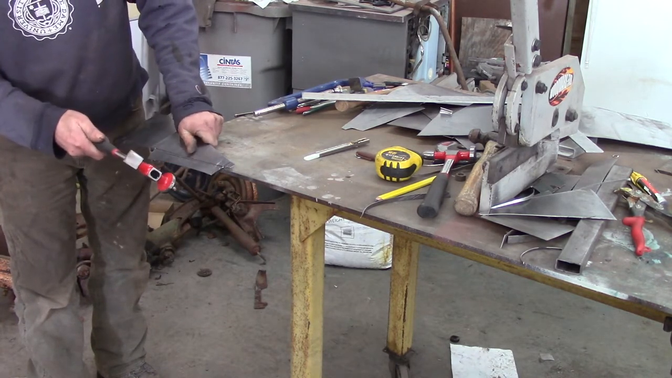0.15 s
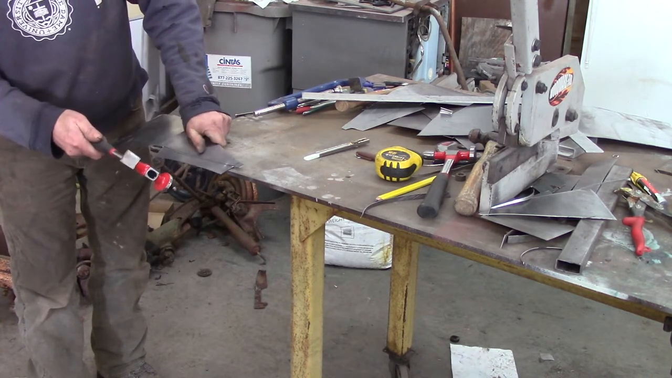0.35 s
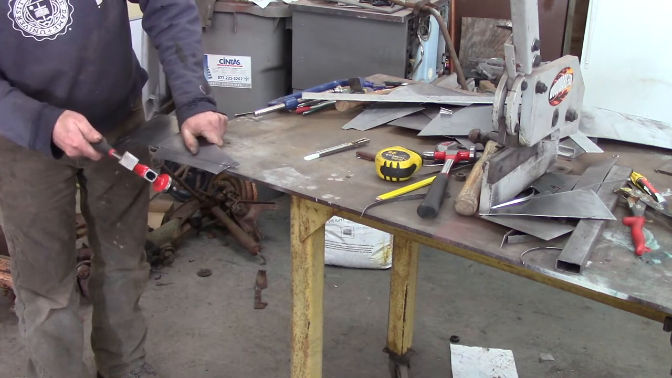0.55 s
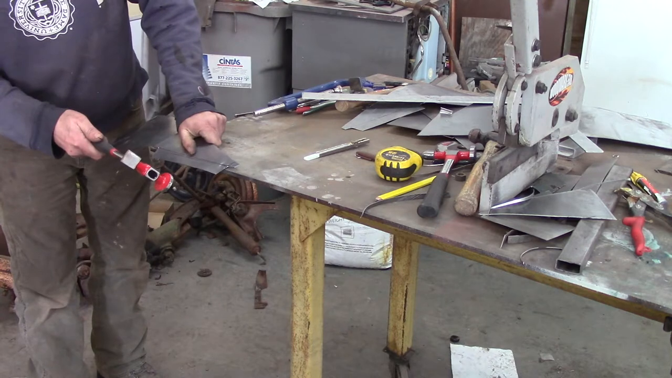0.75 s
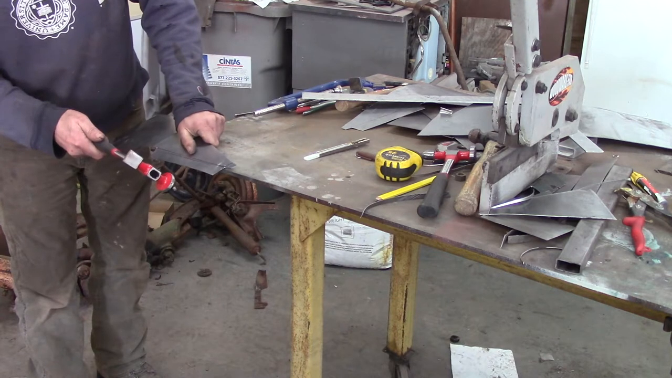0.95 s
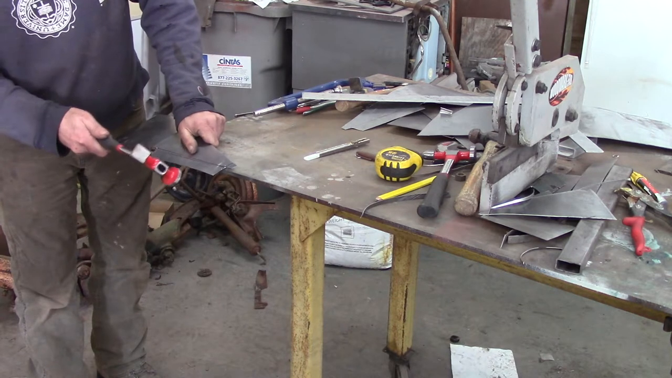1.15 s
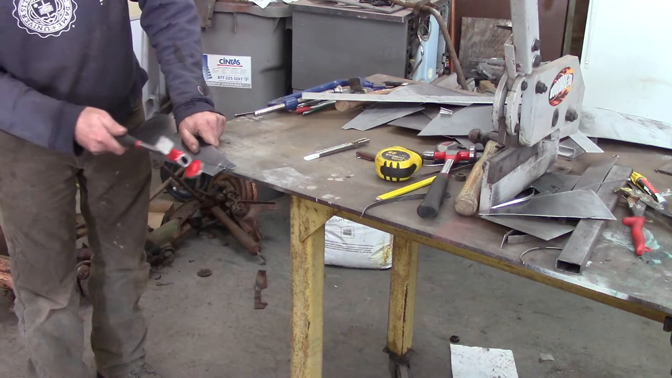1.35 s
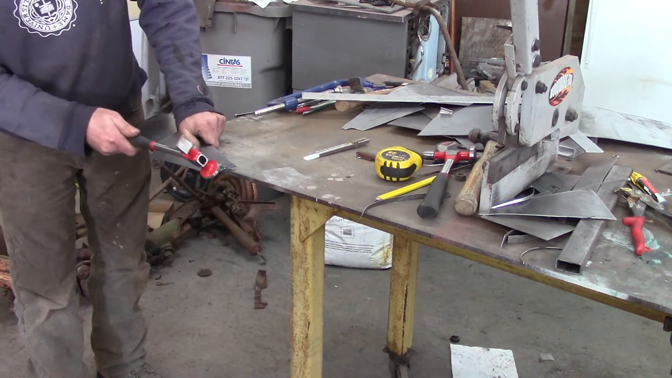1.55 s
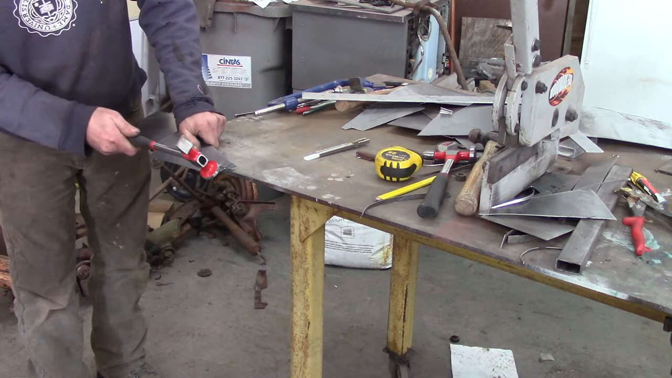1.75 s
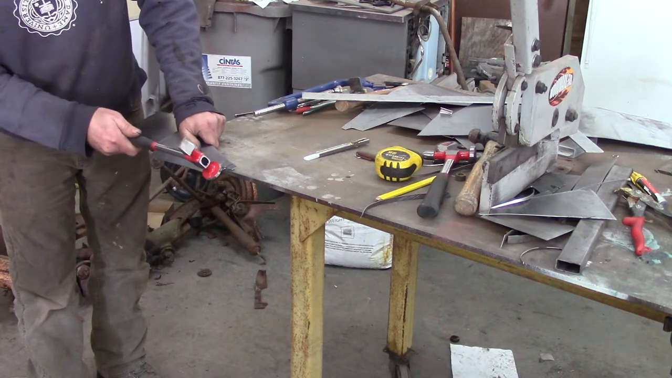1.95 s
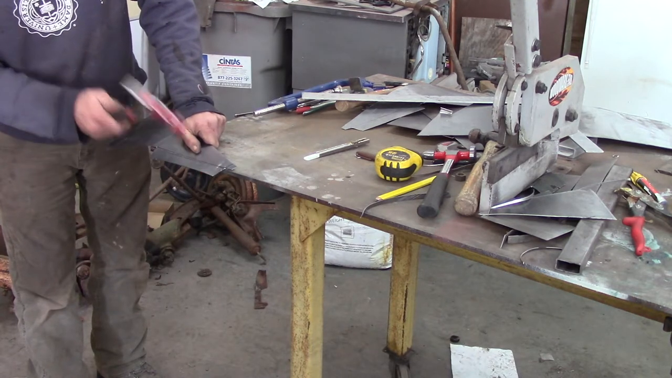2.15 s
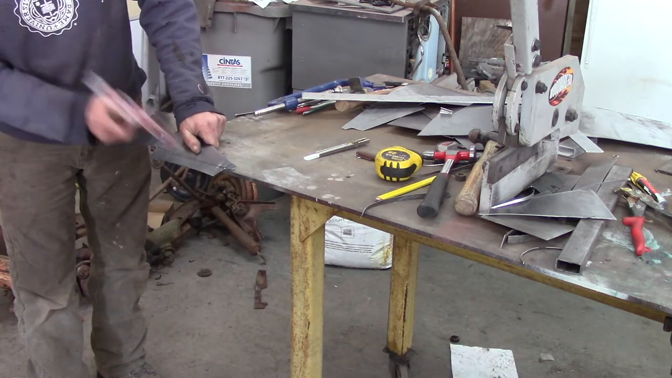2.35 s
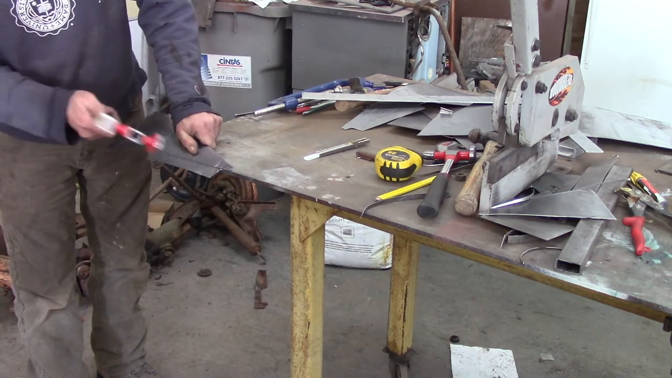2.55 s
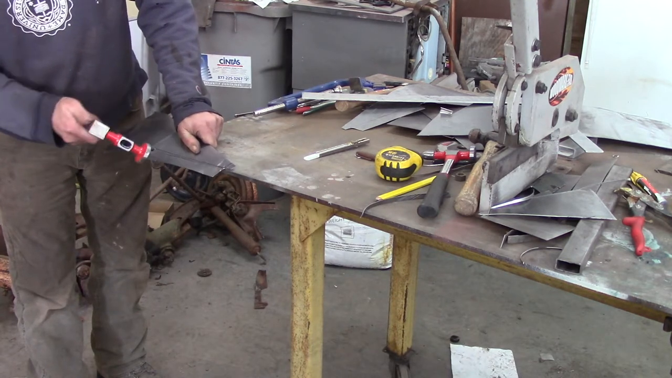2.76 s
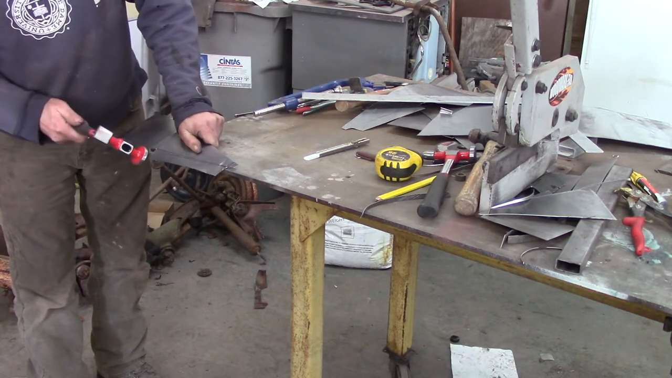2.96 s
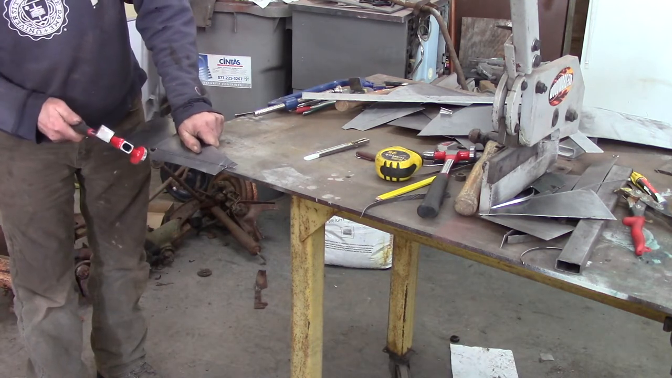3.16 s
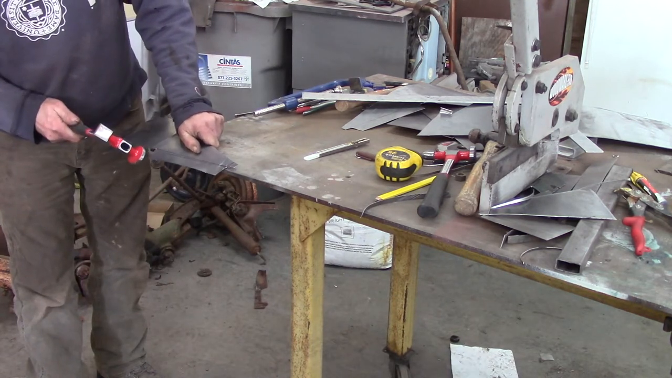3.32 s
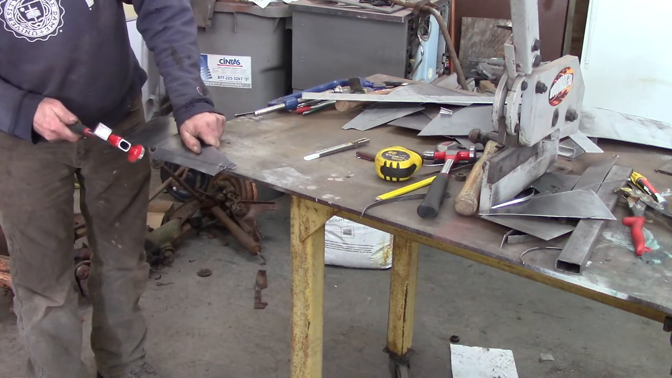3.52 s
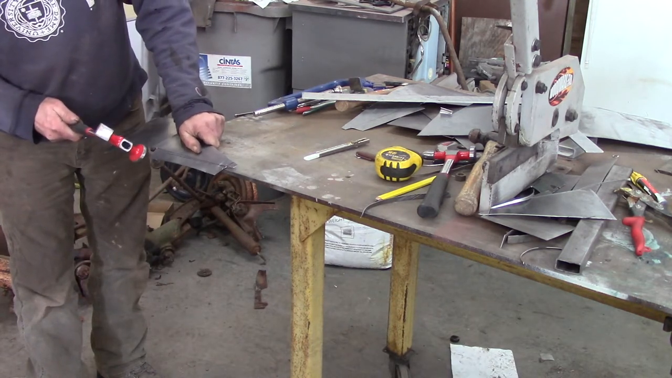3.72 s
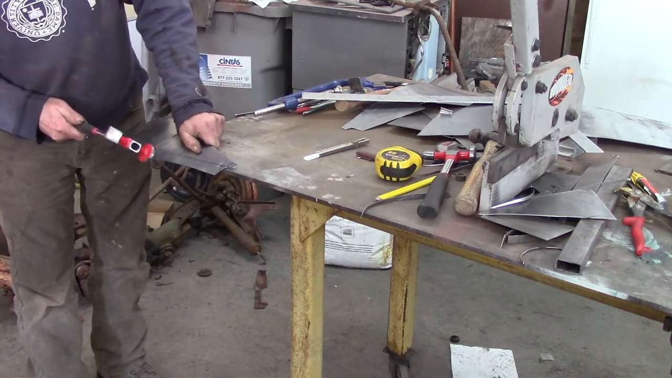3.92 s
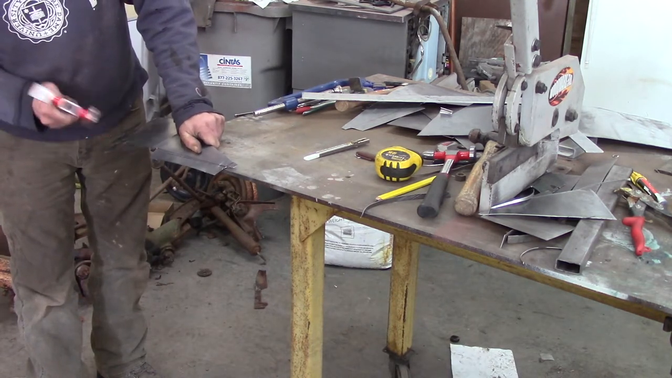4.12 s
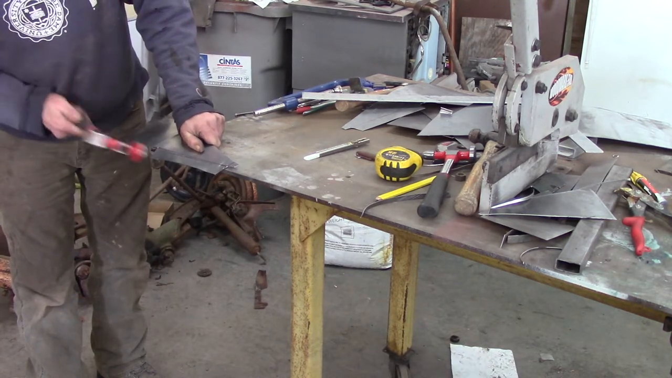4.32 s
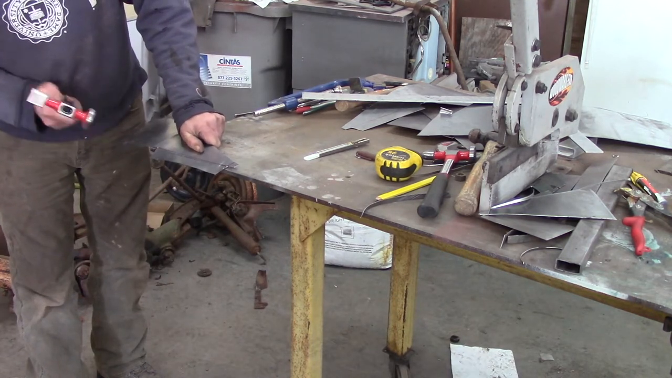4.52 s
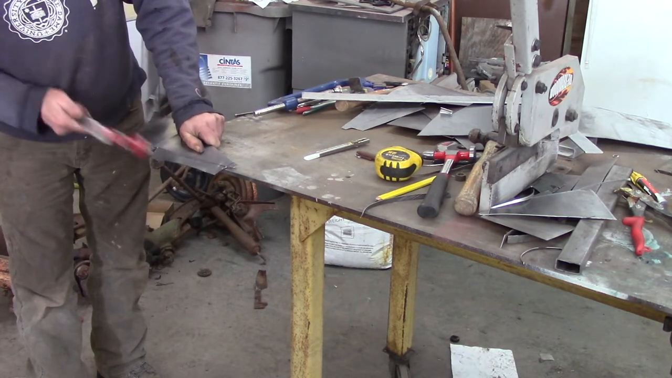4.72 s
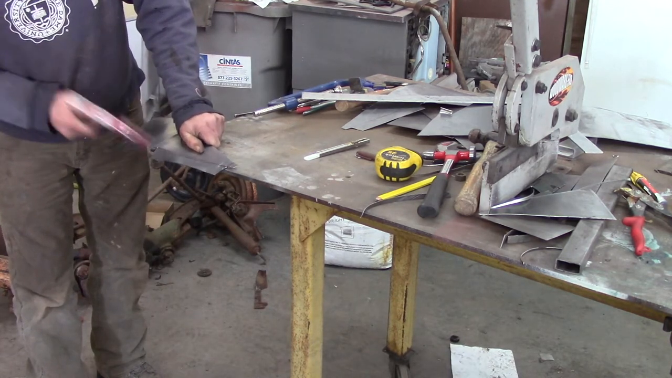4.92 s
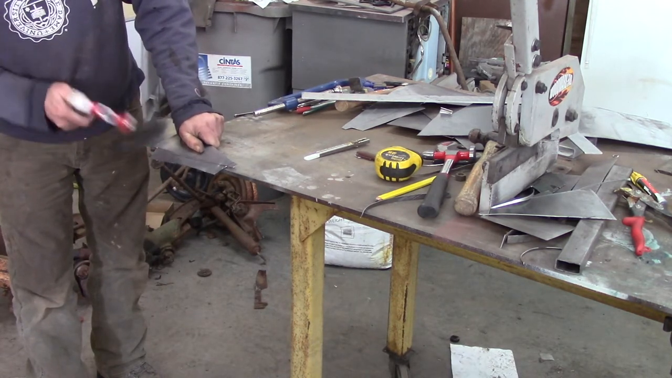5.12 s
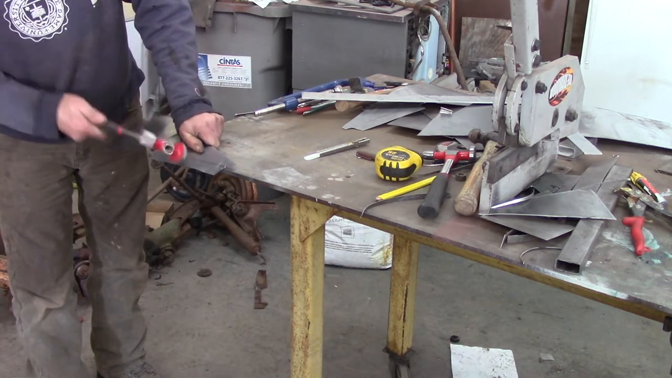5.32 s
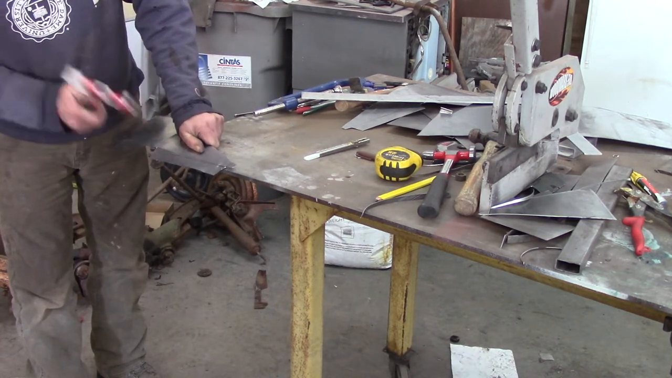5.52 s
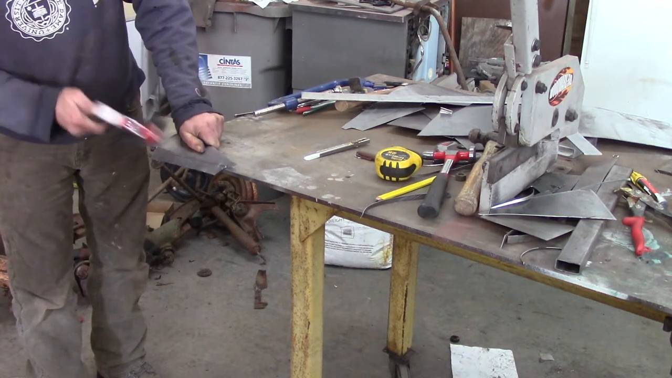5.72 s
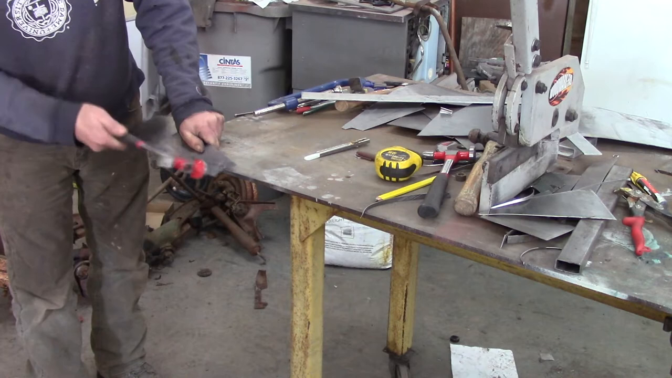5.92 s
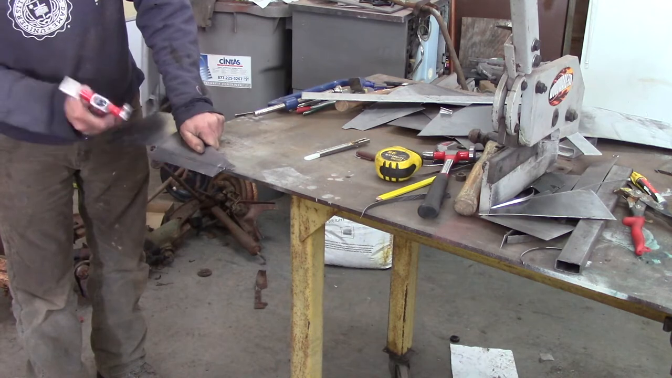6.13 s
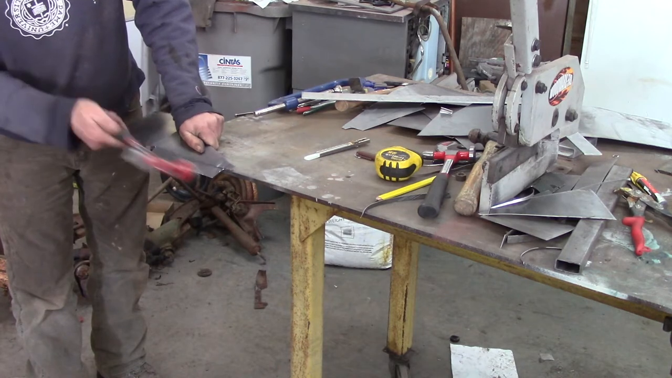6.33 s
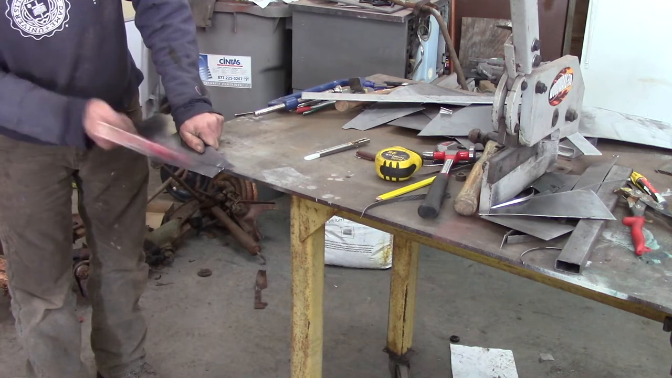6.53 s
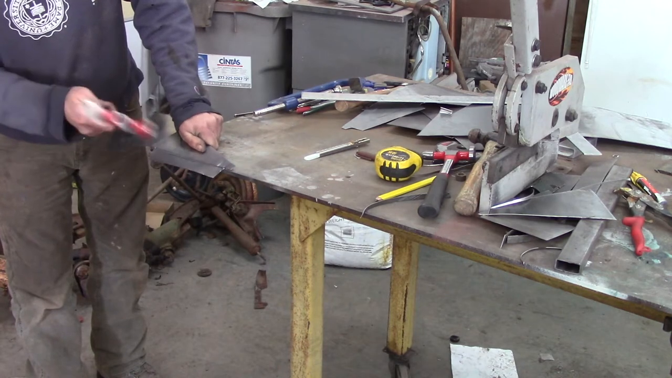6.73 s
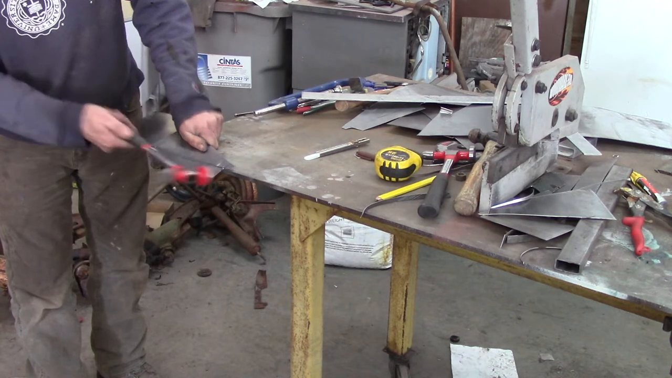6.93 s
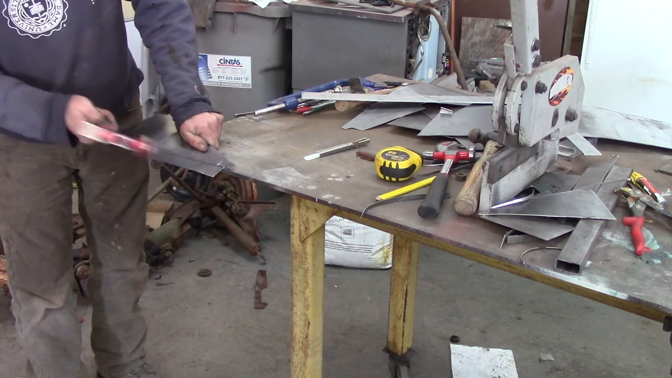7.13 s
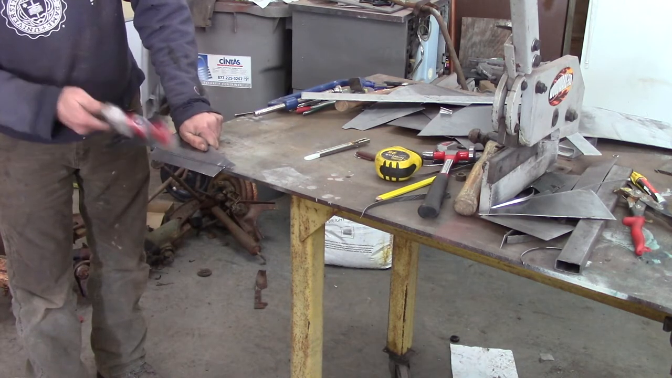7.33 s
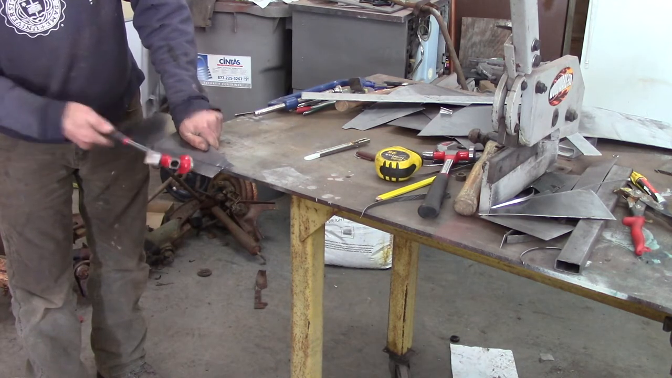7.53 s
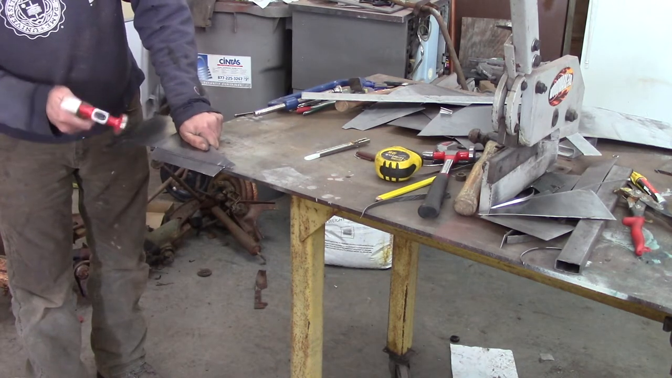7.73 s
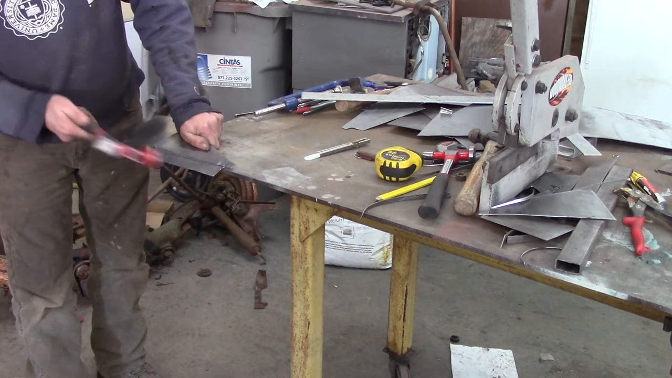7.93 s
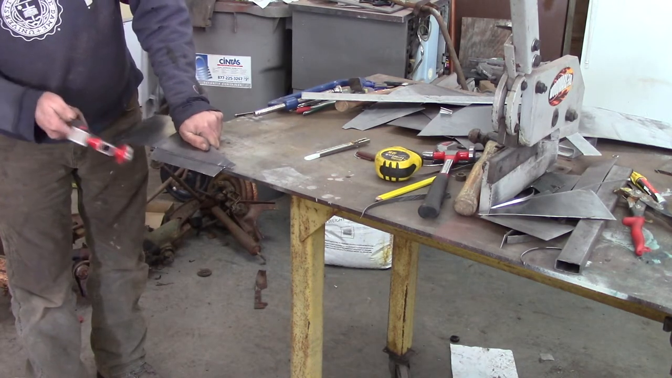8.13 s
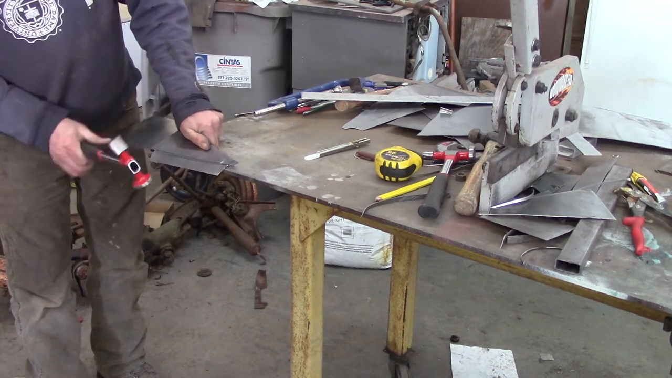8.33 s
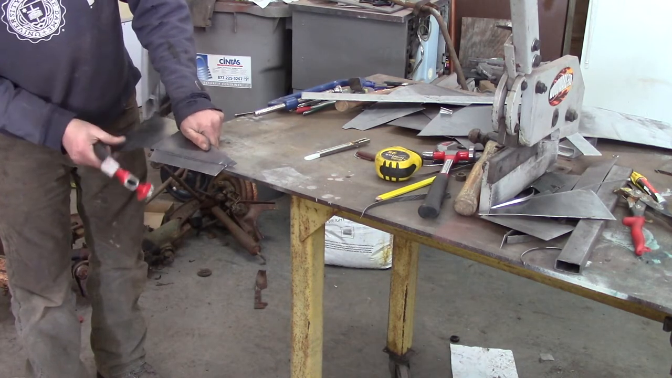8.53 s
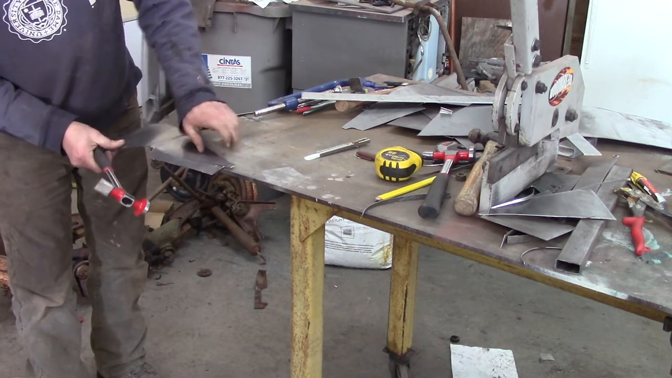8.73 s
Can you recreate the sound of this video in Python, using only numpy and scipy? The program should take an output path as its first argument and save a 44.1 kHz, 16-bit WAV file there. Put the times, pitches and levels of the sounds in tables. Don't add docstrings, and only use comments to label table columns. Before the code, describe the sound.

Faint low room drone and a barely audible rapid ticking from a distant machine. Sheet steel scuffs and clicks, is tapped lightly, then hit hard once. After more quiet handling, a regular run of a dozen full hammer blows rings harshly over the bench edge, overlapping with reverberant tails. It ends in hollow knocks and scrapes. Narrow stereo, close, heavily limited blows.

```python
import sys
import numpy as np
from scipy import signal
from scipy.fft import rfft, irfft
from scipy.io import wavfile
from scipy.ndimage import uniform_filter1d

SR = 44100
rng = np.random.default_rng(int(sys.argv[2]) if len(sys.argv) > 2 else 0)


def pcm_store(signal):
    levels = np.round(np.clip(np.atleast_2d(signal), -1, 1) * 32767)
    wavfile.write(sys.argv[1], SR, levels.astype(np.int16).T)


def magnitude_from_level(level_db):
    exponent = np.asarray(level_db, float) / 20
    return 10 ** exponent


N = 386757

# [f/Hz, level/dB per Hz]
AIR_COLOUR = [(15, -41), (25, -36), (43, -40.5), (134, -15), (301, -5.5), (354, -12), (463, -10),
              (641, -14), (695, -15.5), (1020, -20), (1230, -26), (4370, -38), (16000, -49.5)]
# [f/Hz, side minus mid level/dB]
AIR_SIDE = [(60, 6), (110, -12.5), (200, -20), (380, -18.5), (700, -16.5), (1290, -17.5), (2380, -9.5),
            (4400, -16), (8120, -26.5), (15000, -26.5)]
# [start t/s, length t/s, hiss level/dB, rasp level/dB]
SCRAPES = [(0.0, 0.0079, -49, -20.5), (0.144, 0.045, -43.5, -29), (0.187, 0.037, -42.5, -24),
           (0.478, 0.061, -60, -35.5), (0.734, 0.043, -61, -34.5), (0.906, .02, -66, -50),
           (3.432, 0.17, -79, -59), (8.308, 0.081, -68, -41), (8.597, 0.17, -75, -51),
           (8.511, 0.034, -58, -32.5), (8.537, 0.033, -50, -39), (8.645, .025, -54.5, -54),
           (8.737, .03, -51, -42)]
# [f/Hz, level/dB per Hz]
GRIT = [(880, -38), (1500, -21.5), (2300, -9), (2900, -2), (4330, -9.5), (9010, -10.5), (12900, -23.5),
        (16000, -38)]
# [f/Hz, width f/Hz, level/dB]
RASP_PEAKS = [(244, 62, 3.5), (734, 400, 11), (950, 510, 11), (1250, 760, 0.5)]
# [t/s, click level/dB, knock level/dB, low knock f/Hz, high knock f/Hz]
TICKS = [(0.164, -43, -23.5, 720, 1160), (0.207, -48, -28, 970, 1350), (0.5386, -43, -33, 600, 1370),
         (0.7565, -47, -35, 940, 1440), (0.9206, -55, -39, 730, 1460), (1.9165, -38.5, -29, 633, 1370),
         (2.9382, -42.5, -19.5, 735, 1250), (3.0294, -55, -35, 570, 990), (3.1192, -60, -37, 550, 1140),
         (3.4466, -51.5, -32, 950, 1450), (3.5124, -46, -31.5, 850, 1360), (3.6147, -57, -35, 730, 980),
         (8.1194, -34, -28, 646, 980), (8.1994, -43, -21.5, 626, 1270), (8.259, -46, -34, 580, 1286),
         (8.4208, -45.5, -30, 704, 1300), (8.4424, -47, -45, 630, 1240), (8.4856, -34.5, -22, 815, 1540),
         (8.514, -56, -21.5, 242, 350), (8.63, -64, -22, 235, 340), (8.745, -64, -26, 240, 332),
         (8.5494, -47, -30, 770, 1310), (8.6683, -55, -49, 590, 1320), (8.7305, -43, -35, 850, 1320)]
# [t/s, strength level/dB, crack level/dB, ring level/dB, brightness dB/octave]
TAPS = [
    (0.247, -17.5, 6.5, -6, 4),
    (1.458, -10, -1.5, -5, 0),
    (1.846, -16.5, -3, -5, -1),
]
# [f/Hz, level/dB, time to fall 60 dB t/s]
SHEET_MODES = [(610, -10, 0.68), (1170, -7.5, 0.23), (1300, -6, .25), (1386, -6, 0.22), (2200, -10.5, .4),
               (2385, -10, 0.14), (3600, -15, 0.19), (3790, -11, .4), (4700, -16, .3), (6115, -10.5, .27),
               (6520, -15, 0.18), (7220, -19, .2)]
# [f/Hz, level/dB per Hz]
TOUCH = [(240, -32.5), (520, -15), (1320, -3.5), (1780, -12), (3800, -14.5), (4300, -22.5), (6400, -18),
         (16000, -41.5)]
# [f/Hz, level/dB per Hz]
CRACK = [(880, -29), (1500, -11), (2740, -1), (5540, -6.5), (6240, -3), (7320, -6), (9950, -1.5),
         (13900, -16.5), (16000, -28)]
# [t/s, strength level/dB, brightness dB/octave, ring level/dB, bite near 3 kHz level/dB]
BLOWS = [(2.345, 5.5, 1.4, 2, 2.5), (4.201, 5.5, 0.86, 0.5, 0.1), (4.572, 7, 1.35, -1, 1.5),
         (4.905, 6, 1, 2.1, 0), (5.216, 6.5, 0.9, 4.8, 1), (5.538, 6.5, 1.24, 6.2, 1.7),
         (5.863, 5, 1.24, 3.5, 4), (6.19, 5.5, 2, 4, 1.5), (6.512, 4.5, 1.74, 5, 1.5),
         (6.831, 4.5, 2, 9, 2), (7.134, 7.5, 1.05, 5, 3), (7.443, 6, 1.2, 3.3, 2), (7.763, 6.5, 1, 4, 1.1)]
# [f/Hz, level/dB per Hz]
CLANG = [(35, -66), (60, -37), (133, -8.5), (363, -9.5), (607, -4), (862, -4.5), (968, -4), (1040, -10.5),
         (1310, -3), (2000, -10.5), (2710, -14.5), (7230, -18.5), (9790, -20), (16000, -41.5)]
# [f/Hz, level/dB, time to fall 60 dB t/s]
BENCH_MODES = [(88.2, -58, 0.56), (140, -19.5, 0.59), (190, -17, 0.37), (235.4, -11.5, 0.45),
               (340, -18.5, 0.54), (472, -27.5, 0.35), (604, -5, 0.3), (593, -20, 0.34), (785.4, -10, 0.5),
               (900, -34, 0.13), (978, -1.5, 0.39), (1101, -15, 0.57), (1237, -4, 0.36), (1325, -2.5, 0.21),
               (1289, -4.5, 0.12), (1653, -11, 0.1), (1755, -13, 0.45), (2210, -8, 0.17),
               (2420, -22.5, 0.16), (2666, -10, 0.28), (3540, -25, 0.2), (3420, -17.5, 0.08)]
# [f/Hz, time to fall 60 dB t/s]
ROOM_T60 = [(100, 0.18), (400, 0.74), (1000, 0.75), (1900, 0.81), (2900, 0.79), (5000, 0.59), (9000, 0.38),
            (15000, 0.36)]

SLAP_S, SLAP_DB = 0.041, -12


def evened(x):
    return x / np.sqrt(np.mean(x ** 2) + 1e-20)


def read(points, hz):
    f, value = np.transpose(points)
    return np.interp(np.log(hz + 1), np.log(f + 1), value)


def add(mix, s, sound):
    part = mix[..., round(s * SR):][..., :sound.shape[-1]]
    part += sound[..., :part.shape[-1]]


def noise(count, colour, tilt_db=0):
    hz = np.fft.rfftfreq(count, 1 / SR)
    gain = magnitude_from_level(read(colour, hz) + tilt_db * np.log2(hz / 1000 + 0.045))
    return evened(irfft(rfft(rng.standard_normal(count)) * gain, count))


def air():
    frames, hz = N // 256 + 5, np.fft.rfftfreq(1024, 1 / SR)
    a, b, c, d, patches = rng.standard_normal((frames, 513, 5)).T
    patches = uniform_filter1d(patches, size=8, axis=0)
    patches = evened(uniform_filter1d(patches, size=10, axis=1))
    side = (c + 1j * d) * magnitude_from_level(read(AIR_SIDE, hz))[:, None]
    z = np.array([a + 1j * b, side])
    z *= magnitude_from_level(read(AIR_COLOUR, hz)[:, None] + 1.5 * patches)
    x = signal.istft(z, nperseg=1024, noverlap=768)[1][:, :N]
    return magnitude_from_level(-47.5) * x / np.std(x[0])


def sheet_rasp(x):
    out = 0
    for hz, width, db in RASP_PEAKS:
        peak = signal.iirpeak(hz, hz / width, SR)
        out = out + magnitude_from_level(db) * signal.lfilter(*peak, signal.lfilter(*peak, x))
    return out


def scrapes():
    out, t = np.zeros(N), np.arange(SR // 4) / SR
    for s, length, hiss_db, rasp_db in SCRAPES:
        lean_db = 2 * np.maximum(1 - t / length, 0)
        release_db = 60 * np.maximum(t - length, 0) / 0.086
        press = magnitude_from_level(lean_db - release_db) * np.minimum(t / 0.02, 1) ** 2
        grain = magnitude_from_level(1.8 * evened(uniform_filter1d(rng.standard_normal(len(t)), size=150)))
        hiss = magnitude_from_level(hiss_db) * noise(len(t), GRIT)
        rasp = magnitude_from_level(rasp_db - 10.0) * evened(sheet_rasp(rng.standard_normal(len(t))))
        add(out, s, (hiss + rasp) * evened(grain) * press)
    return out


def machine():
    out, t = np.zeros(N), np.arange(1500) / SR
    tones = np.sin(2 * np.pi * 1760 * t) + magnitude_from_level(-9.5) * np.sin(2 * np.pi * 2150 * t)
    pip = magnitude_from_level(-60 * t / 0.045) * tones * np.minimum(t / 0.0022, 1)
    times = np.arange(0.0243, N / SR, 0.06672)
    for k, (s, luck) in enumerate(zip(times, rng.standard_normal(len(times)))):
        add(out, s, magnitude_from_level(-49.0 - 9.5 * (k % 2) + 2.5 * luck) * pip)
    return out


def ticks():
    out, t = np.zeros((2, N)), np.arange(6000) / SR
    dull = signal.butter(2, 2200., fs=SR)
    for s, click_db, knock_db, low_hz, high_hz in TICKS:
        click = magnitude_from_level(click_db - 60 * t / 0.046) * noise(len(t), GRIT, tilt_db=0.5)
        click *= np.minimum(t / 0.0021, 1)
        shake = magnitude_from_level(-60 * t / 0.052) * rng.standard_normal(len(t))
        low = signal.lfilter(*signal.iirpeak(low_hz, 8, SR), shake)
        high = signal.lfilter(*signal.iirpeak(high_hz, 8, SR), shake)
        hollow = magnitude_from_level(knock_db + 12.0) * signal.lfilter(*dull, low + magnitude_from_level(-1.5) * high)
        add(out, s, np.array([click + hollow, magnitude_from_level(-3.0) * click + hollow]))
    return out


def impulse(colour, tilt_db, count):
    hz = abs(np.fft.fftfreq(4096, 1 / SR))
    log_gain = np.log(magnitude_from_level(read(colour, hz) + tilt_db * np.log2(hz / 1000 + .05)))
    click = np.fft.ifft(np.exp(np.conj(signal.hilbert(log_gain)))).real
    return np.pad(click / np.linalg.norm(click), (0, count - 4096))


def ring(modes, t, spread_db, split, chatter_db):
    out, slow = np.zeros(len(t)), t[::64]
    for (hz, db, t60), luck in zip(modes, rng.standard_normal((len(modes), 3, 3))):
        detune_hz = hz * split * luck[1][:, None] * [[0], [1], [1]]
        phases = 2 * np.pi * detune_hz * slow + 10 * luck[2][:, None]
        beats = magnitude_from_level(spread_db * luck[0]) @ np.exp(1j * phases)
        flicker = rng.standard_normal((2, len(slow)))
        flicker = evened(uniform_filter1d(flicker, size=14, axis=1))
        swell = 1 - np.exp(-slow * hz / 2.6)
        fade = magnitude_from_level(db - 60 * slow / t60 + chatter_db * flicker[0])
        motion = beats * swell * fade * np.exp(.9j * flicker[1])
        wander = np.interp(t, slow, np.unwrap(np.angle(motion + 1e-30)))
        out += np.interp(t, slow, abs(motion)) * np.cos(2 * np.pi * hz * t + wander)
    return out


def strike(modes, colour, tilt_db, ring_db, crack_db, crack_s, rattle_db, rattle_s,
           spread_db, split, slap_db, jolt_db):
    t = np.arange(SR * 3 // 4) / SR
    crack = magnitude_from_level(crack_db - 60 * t / crack_s) * noise(len(t), CRACK) * np.minimum(t / 0.0013, 1) ** 2
    slap = magnitude_from_level(slap_db + 3.8 * rng.standard_normal())
    crack = crack + slap * np.roll(crack, round(SLAP_S * SR))
    jolts = magnitude_from_level(jolt_db * evened(uniform_filter1d(rng.standard_normal(len(t)), size=400)))
    rattle = magnitude_from_level(rattle_db - 60 * t / rattle_s) * (1 - np.exp(-t / 0.0069)) ** 2
    rattle = rattle * noise(len(t), colour, tilt_db) * jolts
    rung = magnitude_from_level(ring_db) * ring(modes, t, spread_db, split, chatter_db=3.)
    feed = magnitude_from_level(28.5) * impulse(colour, tilt_db, len(t)) + magnitude_from_level(-6.5) * rung
    return np.array([crack + rattle + rung, feed])


def touch_colour(peak_db, width_oct):
    hz = np.geomspace(30, SR / 2, 400)
    lift = sum(np.exp(-(np.log2(hz / mode[0]) / width_oct) ** 2) for mode in SHEET_MODES)
    return np.transpose([hz, read(TOUCH, hz) + peak_db * np.minimum(lift, 1)])


def light_taps():
    out = np.zeros((2, N))
    for s, db, crack_db, ring_db, tilt_db in TAPS:
        colour = touch_colour(peak_db=ring_db + 12, width_oct=.04)
        tap = strike(SHEET_MODES, colour, tilt_db, ring_db - 2.5, crack_db + 9.0, crack_s=0.048,
                     rattle_db=9.5, rattle_s=0.16, spread_db=2.5, split=0.015,
                     slap_db=2 * SLAP_DB, jolt_db=.5)
        add(out, s, magnitude_from_level(db - 16.5) * tap)
    return out


def hammer_blows():
    out, hz = np.zeros((2, N)), np.geomspace(30, SR / 2, 60)
    bite = np.exp(-(np.log2(hz / 2950) / .24) ** 2)
    for s, db, tilt_db, ring_db, bite_db in BLOWS:
        colour = np.transpose([hz, read(CLANG, hz) + 2 * bite_db * bite])
        blow = strike(BENCH_MODES, colour, tilt_db, ring_db - 13.5, crack_db=6.5, crack_s=0.034,
                      rattle_db=-1.0, rattle_s=0.26, spread_db=3.0, split=.011,
                      slap_db=SLAP_DB, jolt_db=2.5)
        add(out, s, magnitude_from_level(db - 0.5) * blow)
    return out


def shop(x, count=3):
    taps = np.zeros((2 * count, SR))
    at = np.arange(300, SR - 20, 20) + rng.integers(0, 20, (2 * count, (SR - 301) // 20))
    np.put_along_axis(taps, at, rng.choice([-1., 1.], at.shape), 1)
    hz, t, z = signal.stft(taps, SR, nperseg=256)
    build = 1 - np.exp(-t / (0.001 + 3.5 / (hz[:, None] + 100)))
    lumps = uniform_filter1d(rng.standard_normal(z.shape), size=5, axis=2)
    lumps = evened(uniform_filter1d(lumps, size=30, axis=1))
    fade = magnitude_from_level(-60 * t / read(ROOM_T60, hz)[:, None])
    tails = signal.istft(z * magnitude_from_level(1.87 * lumps) * build * fade, SR, nperseg=256)[1][:, :SR]
    tails /= np.linalg.norm(tails, axis=1, keepdims=True)
    turn = np.pi * (np.arange(N) / SR + np.arange(count)[:, None] / count)
    fed = np.tile(x * np.cos(turn) * np.sqrt(2 / count), (2, 1))
    return signal.fftconvolve(fed, tails, axes=1)[:, :N].reshape(2, count, N).sum(1)


def scene():
    direct, feed = scrapes() + ticks() + light_taps() + hammer_blows()
    wet, back = shop(feed), air()
    mid = direct + wet[0] + back[0] + machine()
    late = np.roll(direct, shift=30)
    side = magnitude_from_level(-43.5) * mid + magnitude_from_level(-31.5) * late + magnitude_from_level(-31.5) * wet[1] + back[1]
    return np.array([mid + side, mid - side])


def roll_off(x):
    return signal.sosfilt(signal.butter(12, 16440, fs=SR, output="sos"), x)


def record(dry):
    power_db = 10 * np.log10(signal.lfilter([.01], [1, -.99], (dry ** 2).mean(0)) + 1e-12)
    fall = np.arange(N) * 103.0 / SR
    level_db = np.maximum.accumulate(power_db + fall) - fall
    over_db = 0.94 * 1.357 * np.logaddexp(0, (level_db + 8.5) / 1.271)
    held = dry / magnitude_from_level(signal.lfilter([.03], [1, -.97], over_db))
    clipped = held / (1 + abs(held / .86) ** 4) ** .25
    low_cut = signal.butter(2, 60., "highpass", fs=SR, output="sos")
    high_cut = signal.butter(10, 16000, fs=SR, output="sos")
    mix = signal.sosfilt(np.vstack([low_cut, high_cut]), clipped)
    return roll_off(mix)


dry = scene()
out = record(dry)
pcm_store(out)
```